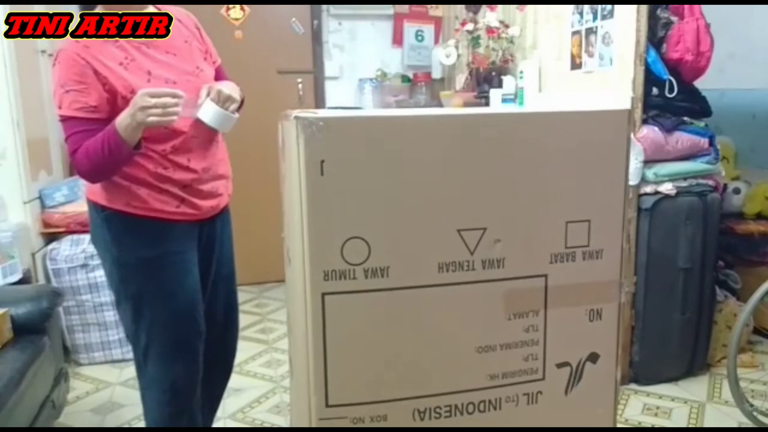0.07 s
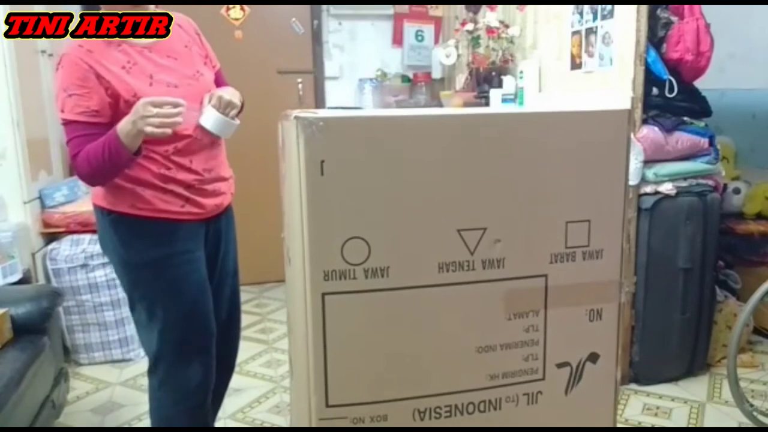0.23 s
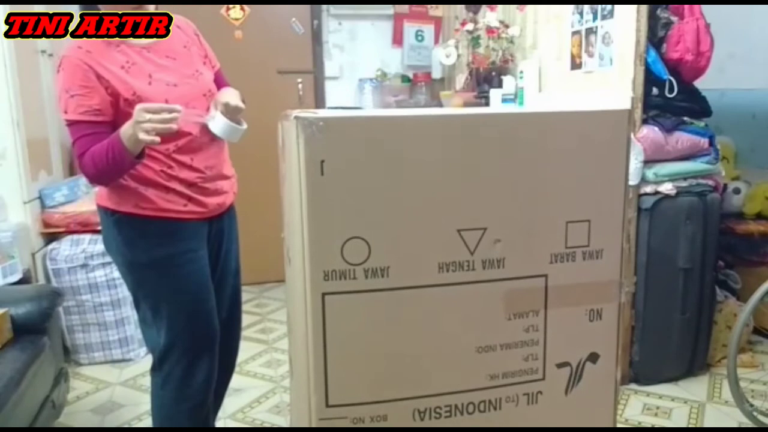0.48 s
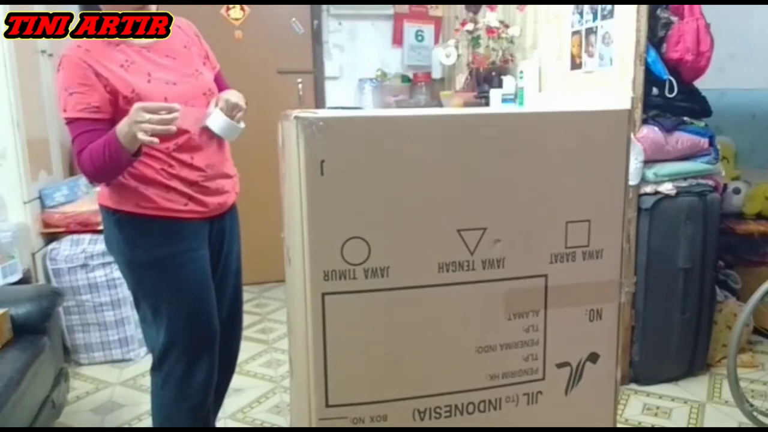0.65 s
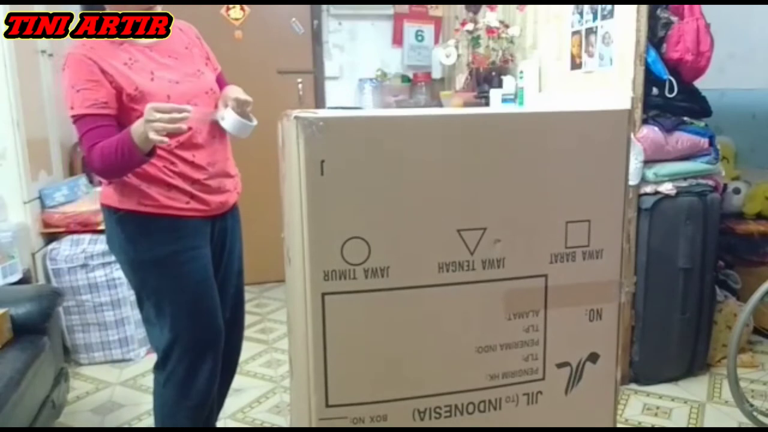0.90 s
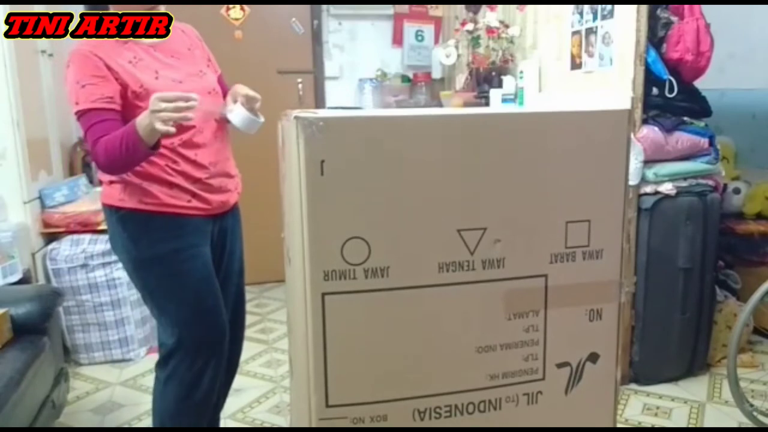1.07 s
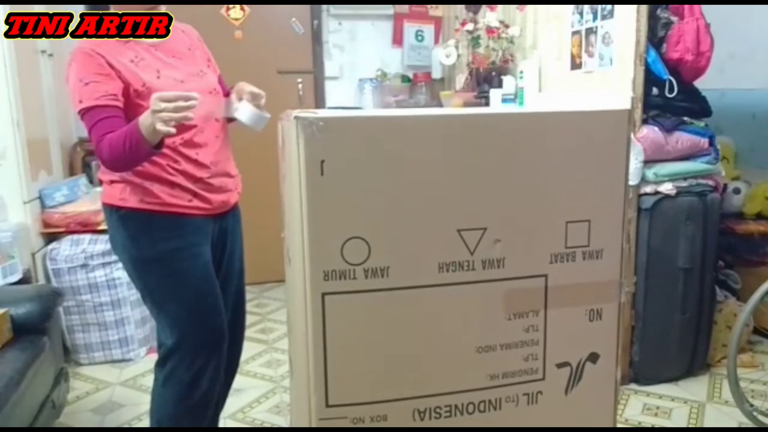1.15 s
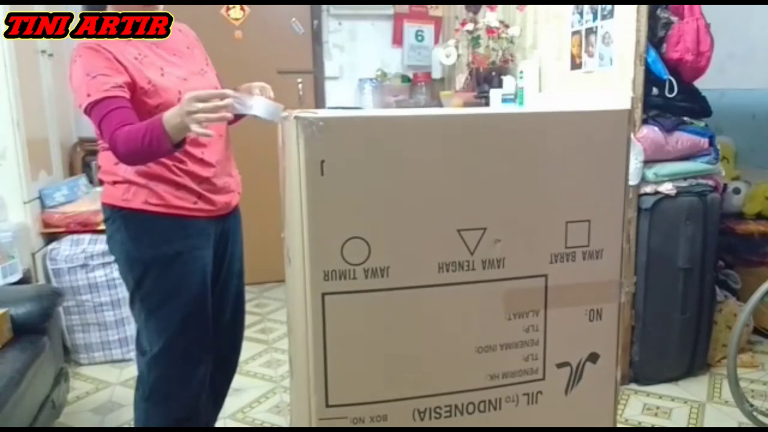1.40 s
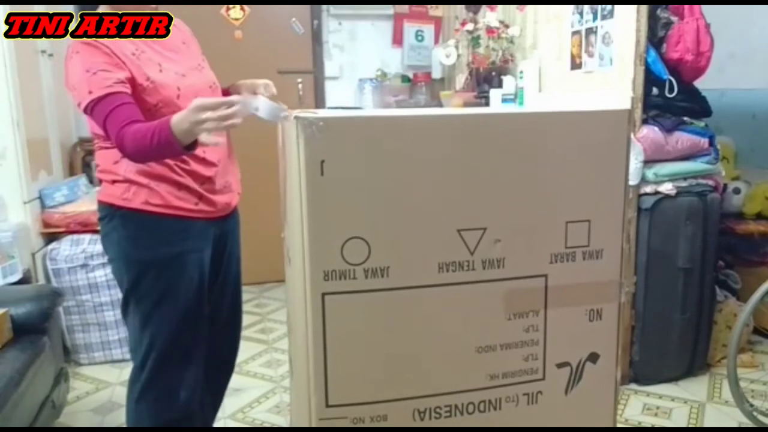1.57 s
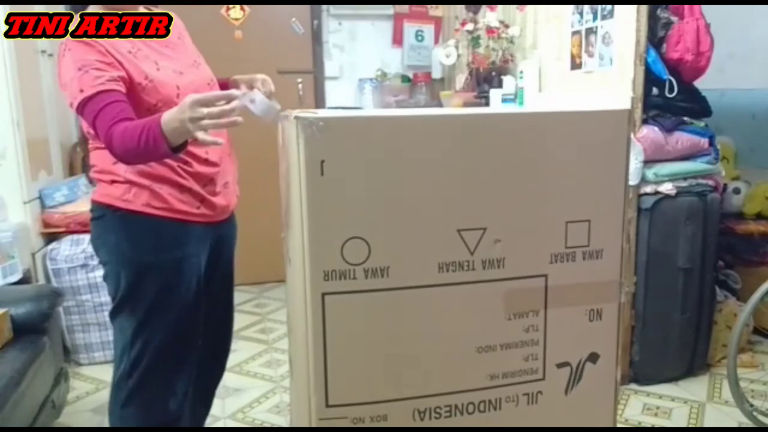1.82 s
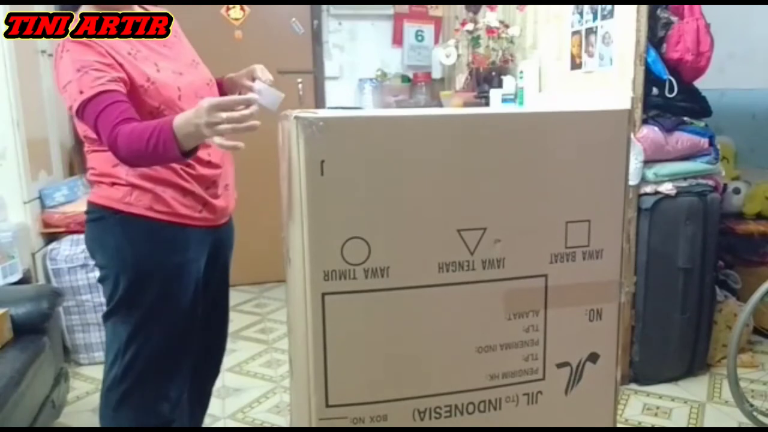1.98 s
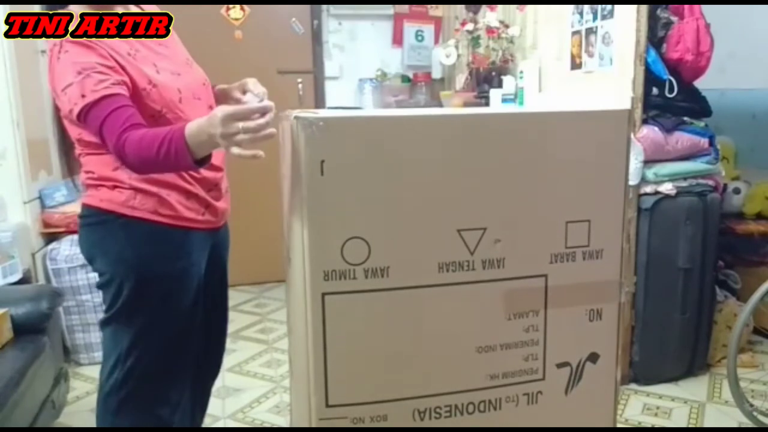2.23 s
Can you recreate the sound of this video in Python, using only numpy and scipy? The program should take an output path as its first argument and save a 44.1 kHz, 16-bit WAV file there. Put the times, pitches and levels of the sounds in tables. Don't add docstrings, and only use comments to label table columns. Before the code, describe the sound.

Packing tape ripped off its roll in short, sharp, crackling jerks inside a small furnished room

```python
import sys
import numpy as np
from scipy import signal
from scipy.fft import rfft, irfft, next_fast_len
from scipy.io import wavfile
from scipy.ndimage import uniform_filter1d, map_coordinates

SR = 44100
rng = np.random.default_rng(int(sys.argv[2]) if len(sys.argv) > 2 else 0)


def log_audio(samples):
    frames = np.atleast_2d(samples).T
    limited = np.clip(frames, -1, 1)
    pcm = np.round(limited * 32767).astype(np.int16)
    wavfile.write(sys.argv[1], SR, pcm)


def invert_db(level):
    return 10 ** (np.asarray(level, dtype=float) / 20)


N = 99225

# start_s, length_s, level_db, core_knock_db
SHORT_JERKS = [(.0, .012, -45, 2), (0.046, .02, -37, -4), (0.097, .004, -34.5, -3.5), (.175, .005, -36, -2),
               (0.21, .014, -31.5, 2), (.592, .003, -30.5, -3), (.659, .004, -30, -5.5),
               (.688, 0.012, -31.5, -0.5), (.704, .005, -35.5, 5), (.735, .014, -30.5, 2.5),
               (0.989, .003, -26.5, -4), (1.019, .004, -35, 5), (1.031, .012, -36, 0),
               (1.135, .004, -31.5, -3), (1.648, .008, -29.5, -5.5), (1.907, .008, -33.5, -3.5),
               (1.931, .006, -26, -10), (1.96, .004, -30, -10), (1.073, .012, -28.5, -6)]
# start_s, length_s, start_level_db, mid_level_db, end_level_db, core_knock_db
LONG_PULLS = [
    (.33, 0.11, -31.5, -27.5, -32, 3.5),
    (0.833, 0.14, -29.5, -26.5, -35.5, 1.5),
    (0.968, 0.16, -51.5, -38, -45, 0.5),
    (1.067, 0.12, -33.5, -36.5, -42.5, 0.5),
    (1.515, 0.12, -29.5, -32.5, -32.5, 0.5),
    (1.89, .09, -36, -45, -44, 1.5),
]
# freq_hz, level_db_per_hz
FILM_SPECTRUM = [(760, -37), (1300, -5), (2630, 1.5), (2920, -1.5), (4780, -8.5), (6550, 0), (8700, -18.5),
                 (14900, -27), (16000, -24)]
# freq_hz, width_hz, level_db
CORE_MODES = [(727.3, 130, 2.5), (1024, 156, 0.5), (1241, 80, 2.5)]
# freq_hz, width_hz, level_db
FLAP_MODES = [(300, 74, -2.5), (342.6, 42, 2.5), (554, 27, 2.5)]
# delay_s, left_db, right_db
NEAR_ECHOES = [(.0045, 4, 3.5), (.0075, -10, 3.5), (.011, -9, -21.5), (.0155, -21.5, -13),
               (.021, -7.5, -13)]
# freq_hz, t60_s
ROOM_DECAY = [(200, 0.1), (530, 0.22), (1390, 0.26), (3680, 0.25), (9700, 0.23)]
# freq_hz, likeness_0_to_1
DIFFUSE_LIKENESS = [(60, 0.53), (300, .85), (650, .4), (1400, .05)]
# freq_hz, level_db_per_hz
AIR_SPECTRUM = [(15, -20), (25, -6.5), (301, -10), (405, -18.5), (624, -15.5), (4140, -23.5), (6740, -11.5),
                (9070, -41.5), (16000, -31.5)]
# start_s, length_s, level_db, centre_hz, width_hz
CLOTH_RUSTLES = [
    (1.28, 0.13, -58, 2460, 960),
    (1.44, 0.062, -88, 7700, 1500),
    (2.155, 0.091, -74, 680, 490),
    (2.185, .015, -72, 6300, 2000),
    (1.5, 0.45, -74, 55, 30),
]
# freq_hz, left_minus_right_db
PORT_LEAN = [(60, -4), (180, 7), (550, 1.5), (1650, 3), (4970, 4.5), (15000, -1.5)]

SLIPS_PER_S, SLIP_UNEVENNESS, SLIP_SIZE_DB, SLIP_CLUMP_DB = 1800, .8, 4, 4
CRACK_DECAY_S, CRACK_FUZZ_DB, STEADY_S = 0.00074, -4.5, .008
FIRST_SLIP_DB, JERK_FALL_DB = 17, 6.5
FILM_DB, CORE_DB, THUMP_DB = -2, -6, -13.5
FLAP_DB, FLAP_GROWS_DB, FLAP_FREE_S = -13.5, 16.5, 0.99
ROOM_DB, ROOM_ONSET_S, ECHO_SCATTER_S = 3.5, 0.0092, 0.00041
HAND_MOVE_S, PORT_LAG_S = .1, .00015
AIR_DB, TOP_HZ = -77.5, 15750


def unit(x):
    return x / np.sqrt(np.mean(x ** 2) + 1e-20)


def along(points, hz):
    point_hz, value = np.transpose(points)
    return np.interp(np.log(hz + 1), np.log(point_hz + 1), value)


def wobble(knots_per_s):
    knots = rng.standard_normal(int(N * knots_per_s / SR) + 4)
    return map_coordinates(knots, [np.arange(N) * knots_per_s / SR])


def filtered(x, response):
    size = next_fast_len(x.shape[-1] + SR // 4)
    spectrum = rfft(x, size) * response(np.fft.rfftfreq(size, 1 / SR))
    return irfft(spectrum, size)[..., :x.shape[-1]]


def causal(points):
    level_db = np.maximum(along(points, np.fft.rfftfreq(2048, 1 / SR)), -60)
    cepstrum = irfft(np.log(invert_db(level_db)))
    cepstrum[1:1024] *= 2
    cepstrum[1025:] = 0
    impulse = irfft(np.exp(rfft(cepstrum)))[:1024]
    return impulse / np.linalg.norm(impulse)


def ring(hz, modes):
    total = 0
    for k, (centre_hz, width_hz, level_db) in enumerate(modes):
        damping = 1j * hz * width_hz
        total = total + (-1) ** k * invert_db(level_db) * damping / (centre_hz ** 2 - hz ** 2 + damping)
    return total


def through(x, modes):
    grid_hz = np.fft.rfftfreq(N, 1 / SR)
    gain = np.sqrt(np.mean(abs(ring(grid_hz, modes)) ** 2))
    return filtered(x, lambda hz: ring(hz, modes) / gain)


def diffuse(x):
    def mid_side(hz):
        turn = np.arccos(np.clip(along(DIFFUSE_LIKENESS, hz), -1, 1)) / 2
        return np.array([np.cos(turn), np.sin(turn)])
    mid, side = filtered(x, mid_side)
    return np.array([mid + side, mid - side])


def effort():
    t = np.arange(N) / SR
    peel, knock, first = np.zeros((3, N))
    jerks = [(start_s, length_s, db, db - JERK_FALL_DB / 2, db - JERK_FALL_DB, core_db)
             for start_s, length_s, db, core_db in SHORT_JERKS]
    for start_s, length_s, start_db, mid_db, end_db, core_db in LONG_PULLS + jerks:
        end_s = start_s + length_s
        level_db = np.interp(t, [start_s, start_s + length_s / 2, end_s], [start_db, mid_db, end_db])
        gain = invert_db(level_db) * (t >= start_s) * (t < end_s)
        peel = np.maximum(peel, gain)
        knock = np.maximum(knock, gain * invert_db(core_db))
        first[int(start_s * SR) + 2] = invert_db(FIRST_SLIP_DB)
    return peel, knock, first


def even(x):
    power = abs(uniform_filter1d(x ** 2, int(STEADY_S * SR) + 1))
    return x / np.sqrt(power + .02 * np.mean(x ** 2))


def glue_slips():
    gap_draw, size_draw = rng.standard_normal((8000, 2)).T
    gaps_s = np.exp(SLIP_UNEVENNESS * gap_draw - SLIP_UNEVENNESS ** 2 / 2) / SLIPS_PER_S
    at = (np.cumsum(gaps_s) * SR).astype(int)
    slips = np.bincount(at, invert_db(SLIP_SIZE_DB * size_draw), N + 1)[:N]
    slips = slips * invert_db(SLIP_CLUMP_DB * wobble(120))
    crack = np.exp(-np.arange(200) / SR / CRACK_DECAY_S)
    gate = signal.fftconvolve(slips, crack)[:N]
    fuzz = invert_db(CRACK_FUZZ_DB) * unit(gate * rng.standard_normal(N))
    return even(unit(slips * rng.choice([-1, 1], N)) + fuzz)


def film_crackle(slip_force):
    return invert_db(FILM_DB) * signal.fftconvolve(slip_force, causal(FILM_SPECTRUM))[:N]


def core_knock(push):
    broad = through(push, [(860, 1910, 0)])
    return invert_db(CORE_DB) * through(broad, CORE_MODES) / 4


def film_flap(freed_push):
    broad = through(freed_push, [(410, 520, 0)])
    return through(broad, FLAP_MODES) / 10


def film_thump(freed_push):
    once = through(freed_push, [(110, 30, 0.01)])
    return invert_db(THUMP_DB) * through(once, [(110, 30, 0)]) / 20


def tape():
    peel, knock, first = effort()
    steps = glue_slips() + first
    push = knock * steps
    freed = np.clip(np.arange(N) / SR / FLAP_FREE_S, 0, 1)
    freed_push = push * invert_db(FLAP_DB + FLAP_GROWS_DB * (freed - 1))
    return film_crackle(peel * steps) + core_knock(push) + film_flap(freed_push) + film_thump(freed_push)


def near_surfaces():
    port, click = np.array([[1], [-1]]), np.eye(1, SR // 2)
    lags_s = ECHO_SCATTER_S * rng.uniform(-1.045, 1, len(NEAR_ECHOES))

    def echoes(hz):
        total = 0
        for (delay_s, left_db, right_db), lag_s in zip(NEAR_ECHOES, lags_s):
            delays_s = delay_s + port * lag_s / 2
            total = total + invert_db([[left_db], [right_db]]) * np.exp(-2j * np.pi * hz * delays_s)
        return total
    return filtered(click, echoes)


def room_tail():
    noise = diffuse(rng.standard_normal((2, SR // 2)))
    hz, t, z = signal.stft(noise, SR, nperseg=256)
    decay = invert_db(-60 * t / along(ROOM_DECAY, hz)[:, None])
    tail = signal.istft(z * decay, SR, nperseg=256)[1]
    tail = tail * (1 - np.exp(-np.arange(tail.shape[1]) / SR / ROOM_ONSET_S))
    tail = tail[:, :SR // 2]
    return invert_db(ROOM_DB) * tail / np.linalg.norm(tail[0])


def room(x):
    place = np.arange(N) / SR / HAND_MOVE_S
    wet = 0
    for k in range(6):
        answer = near_surfaces() + room_tail()
        distance = abs((place - k + 3) % 6 - 3)
        share = np.cos(np.pi / 2 * np.clip(distance, 0, 1))
        wet = wet + signal.fftconvolve((x * share)[None], answer, axes=1)[:, :N]
    lags_s = PORT_LAG_S * np.array([[1], [0]])
    direct = filtered(x[None], lambda hz: np.exp(-2j * np.pi * hz * lags_s))
    return invert_db(-2.5) * (direct + wet)


def air():
    noise = diffuse(rng.standard_normal((2, N)))
    hush = filtered(noise, lambda hz: invert_db(along(AIR_SPECTRUM, hz)))
    return invert_db(AIR_DB + 1.3 * wobble(8)) * unit(hush)


def rustle():
    t, out = np.arange(N) / SR, np.zeros((2, N))
    for start_s, length_s, level_db, centre_hz, width_hz in CLOTH_RUSTLES:
        rise = (t - start_s) / (0.12 * length_s)
        fall = (start_s + length_s - t) / (0.29 * length_s)
        shape = np.clip(np.minimum(rise, fall), 0, 1)
        grains = rng.standard_normal((2, N)) * invert_db(3.4 * wobble(100))
        band = filtered(grains, lambda hz: ring(hz, [(centre_hz, width_hz, 0)]) ** 2)
        out += invert_db(level_db) * shape * unit(band)
    return out


def scene():
    return room(tape()) + air() + rustle()


def low_pass(x):
    return signal.sosfilt(signal.butter(12, 16510, fs=SR, output="sos"), x)


def record(dry):
    def port_response(hz):
        lean_db = along(PORT_LEAN, hz) * np.array([[.5], [-.5]])
        return invert_db(lean_db) / (1 + (hz / TOP_HZ) ** 60)
    ports = filtered(dry, port_response)
    return low_pass(ports)


dry = scene()
out = record(dry)
log_audio(out)
```